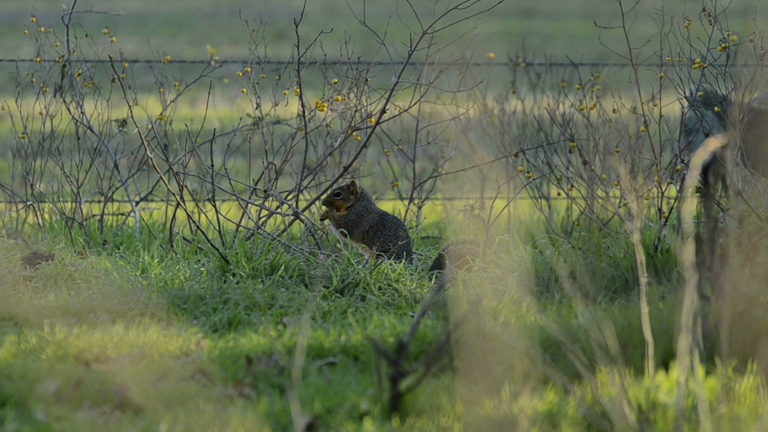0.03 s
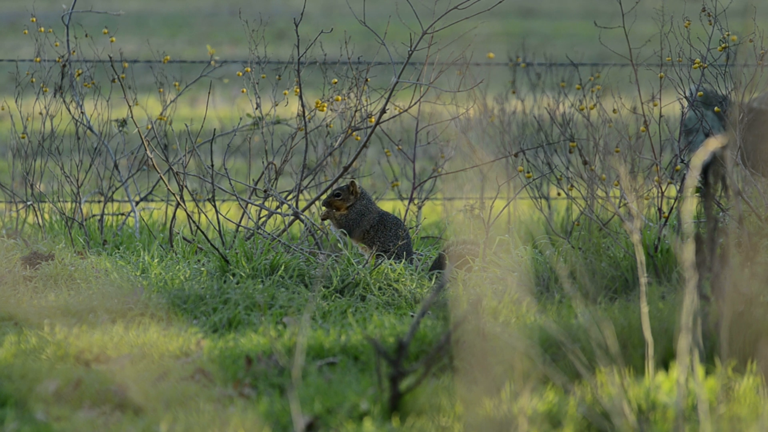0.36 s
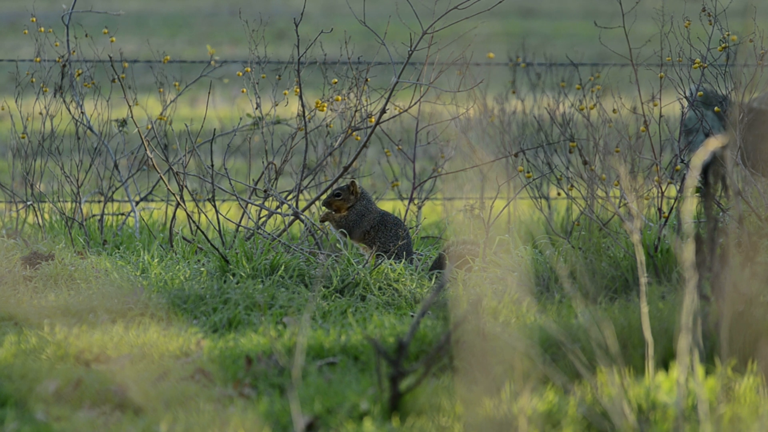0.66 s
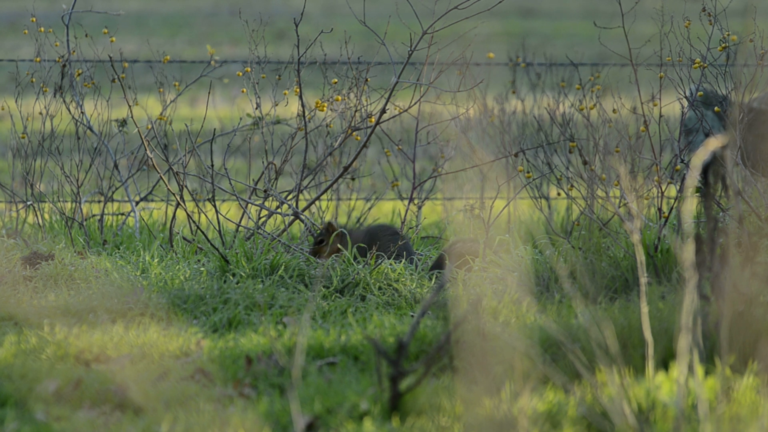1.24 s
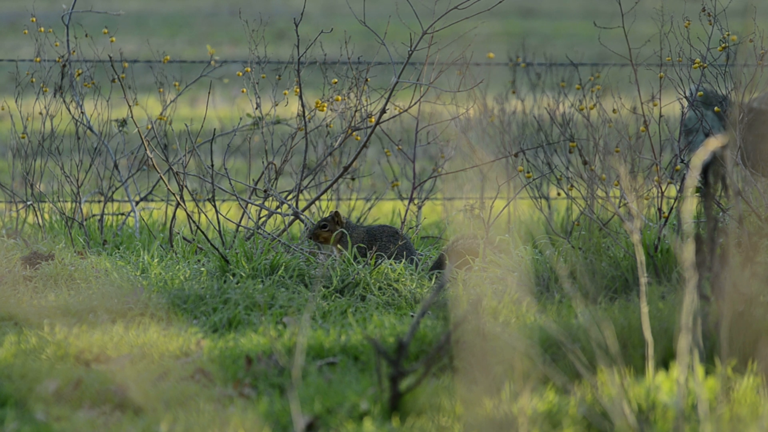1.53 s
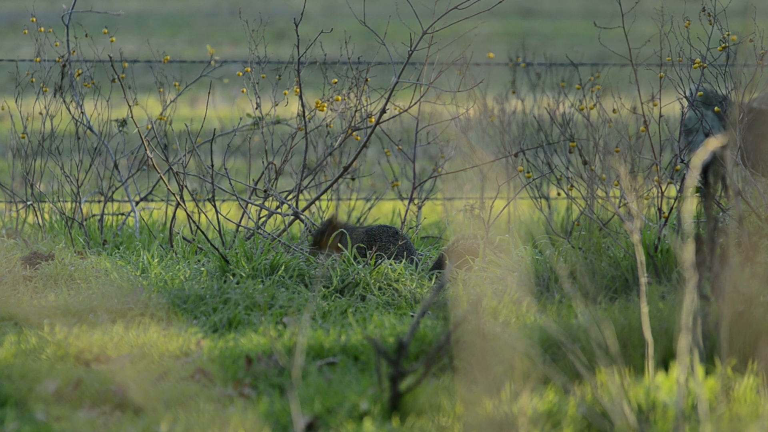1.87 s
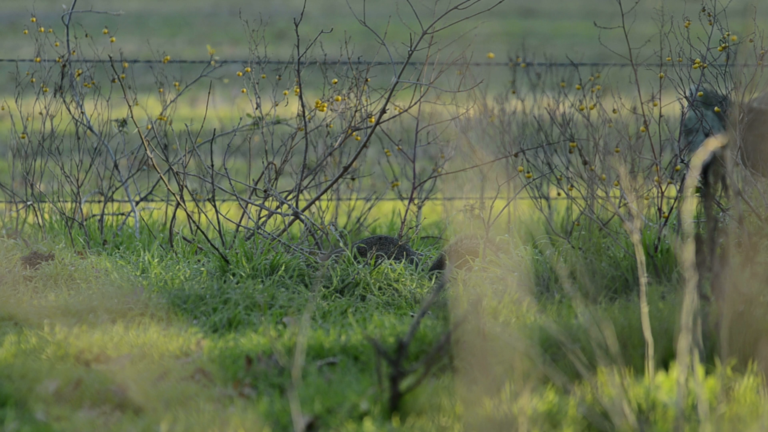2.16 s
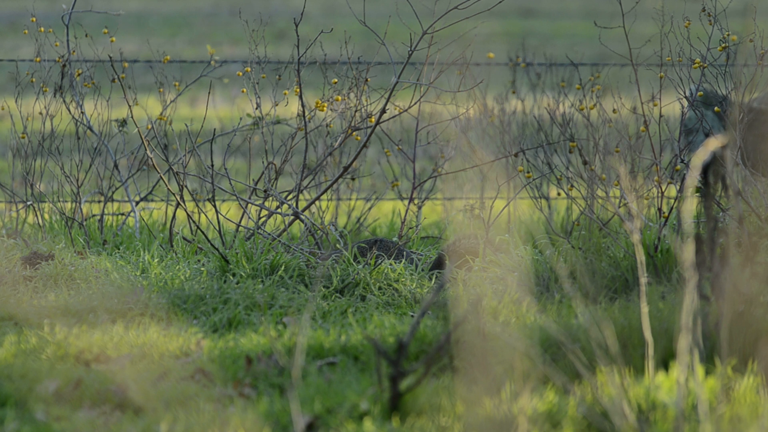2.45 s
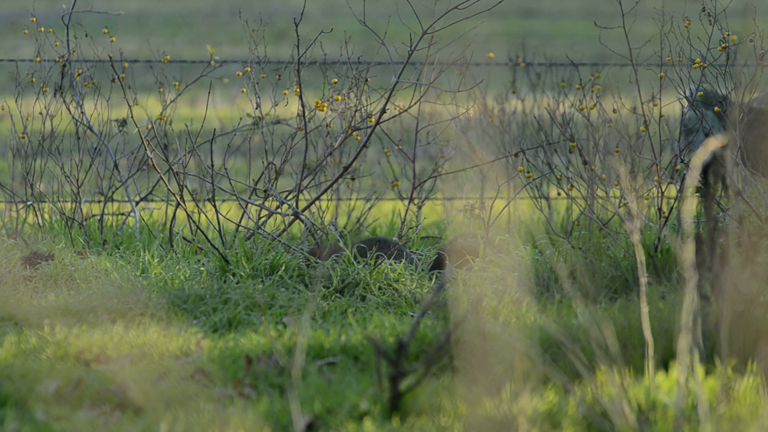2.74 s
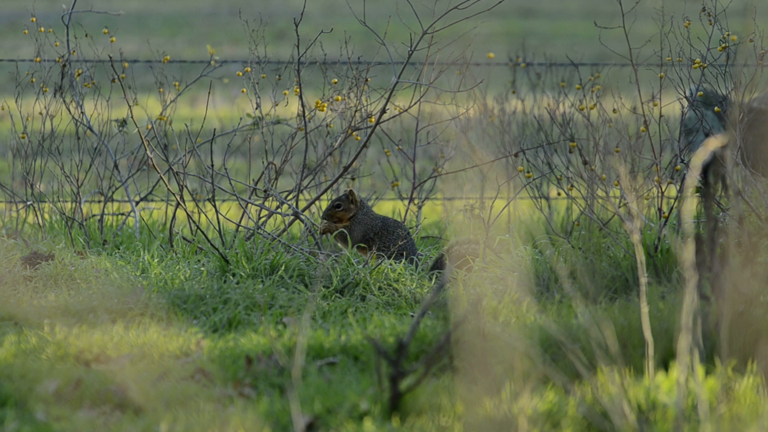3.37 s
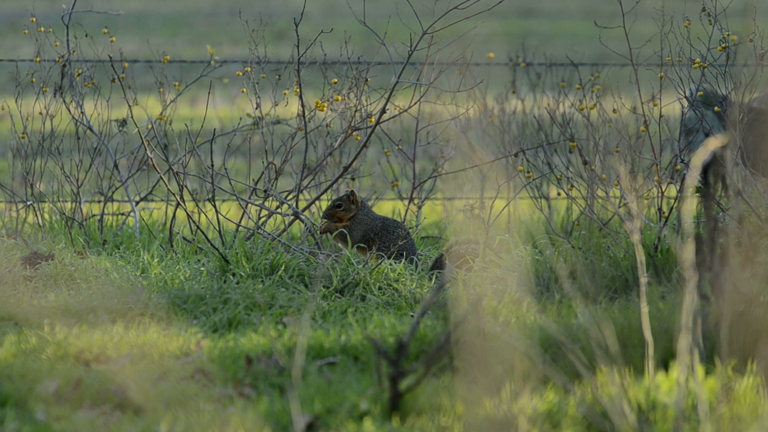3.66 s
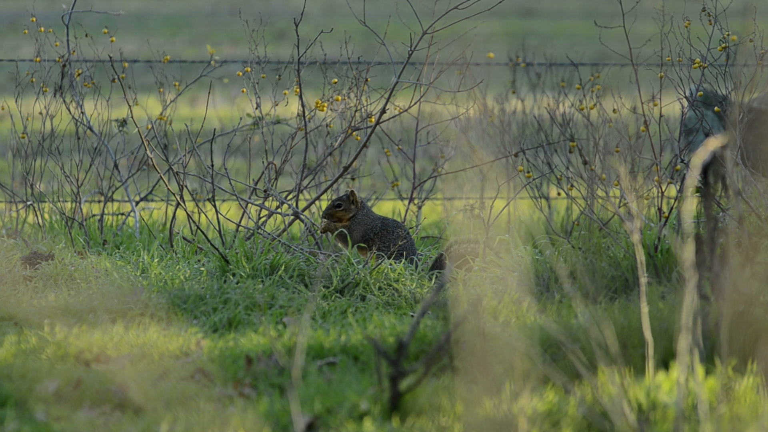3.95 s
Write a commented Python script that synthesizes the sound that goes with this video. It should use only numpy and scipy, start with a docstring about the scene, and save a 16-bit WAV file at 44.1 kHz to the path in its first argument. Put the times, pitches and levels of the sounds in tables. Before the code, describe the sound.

Wind buffets the microphone in an open field, a low, uneven rumble with irregular thumps. It eases around 1 second, then builds from 1.4 to 2.6 seconds. Two short, bright clicks sound close by, at about 1.1 and 2.4 seconds. The wind lulls near 2.8 seconds and gusts again from 3.3 to the end at 4. A faint hiss and barely audible distant bird calls lie underneath.

```python
"""Gusty wind buffets a camera microphone in an open grassy field, with one short lull.
Hundreds of small eddies push and pull at the microphone, with big single buffets among them.
Close by, a small hard part, probably a dial on the camera, clicks twice: a crack and a short ring.
Behind it lie faint brushes of dry grass, very distant hoarse bird calls, one thin falling chirp
and a soft bed of hiss."""
import sys
import numpy as np
from scipy import signal
from scipy.fft import rfft, irfft
from scipy.io import wavfile

SR = 44100
rng = np.random.default_rng(int(sys.argv[2]) if len(sys.argv) > 2 else 0)


def wrap_up_sound(samples):
    """Save the sound to the file named by the first command line argument, as 16-bit audio."""
    columns = np.atleast_2d(samples).T
    # keep every value between -1 and 1, then stretch to whole-number steps
    tamed = np.clip(columns, -1, 1)
    steps = np.round(tamed * 32767).astype(np.int16)
    wavfile.write(sys.argv[1], SR, steps)


N = 176400

# The ride of the wind; faster air is brighter: time_s, level_db, corner_hz
GUSTS = [(0, -29, 117), (.12, -27.5, 111), (.25, -28.5, 109), (.3, -35.5, 84), (.34, -32.5, 111),
         (.55, -30.5, 118), (.72, -32.5, 97.3), (1.2, -34, 78), (1.4, -29, 91), (1.48, -35, 78),
         (1.53, -29, 94), (1.57, -36.5, 85), (1.61, -30, 129), (1.72, -30, 135), (1.87, -31.5, 121),
         (2.06, -27.5, 162), (2.34, -27, 144), (2.42, -31.5, 122), (2.46, -26, 165), (2.562, -30, 177),
         (2.67, -32, 97), (2.77, -38.5, 107), (2.83, -49, 56), (3.11, -49, 42.4), (3.17, -39.5, 54),
         (3.3, -36.5, 79), (3.48, -28, 139), (3.76, -26.5, 157), (3.83, -30, 107), (3.92, -25, 156),
         (4, -31, 123)]
# The biggest single thumps of air: time_s, level_db, corner_hz
BIG_BUFFETS = [(.103, -10, 116), (.141, -20.5, 172), (.328, -12, 117), (.42, -14.5, 131),
               (.502, -22.5, 152), (0.586, -31, 162), (1.355, -17.5, 113), (1.388, -16, 112),
               (1.527, -18, 173), (1.667, -21.5, 190), (1.771, -8.5, 135), (1.798, -12, 169),
               (1.83, -12, 178), (1.955, -20, 256), (2.008, -13.5, 205), (2.064, -12.5, 253),
               (2.173, -30.5, 200), (2.4004, -11, 125), (2.482, -11, 122), (2.495, -12.5, 105),
               (2.519, -11, 141), (2.531, -17.5, 336), (2.584, -10, 169), (2.602, -12, 270),
               (2.77, -19.5, 160), (2.86, -27, 52), (2.982, -31.5, 78.4), (3.161, -28.5, 84),
               (3.353, -14.5, 108), (3.447, -8, 180), (3.493, -17, 232), (3.6, -33, 199),
               (3.642, -16.5, 190), (3.713, -25, 187), (3.793, -13, 158), (3.906, -11.5, 269)]
EDDIES_PER_S, EDDY_HALF_S = 620, .012
SIZE_SPREAD_DB, CORNER_SPREAD = 2, .22
CLUMP_HZ, CLUMP_DB, CLUMP_BRIGHTEN = 30.2, 3, .11
BOOM_HZ, BOOM_WIDTH_HZ, BOOM_DB = 153, 59.6, -11.5
SUBSONIC_HZ, LOW_CUT_HZ, WIND_TOP_HZ = 24, 37, 1610

# Dial click cues: start_s, crack_db, ring_db
DIAL_CLICKS = [(1.1301, -21.5, -28.5), (2.3927, -23.5, -31)]
# Resonances of the dial: pitch_hz, swell_ms, first_click_db, second_click_db
DIAL_MODES = [(1530, .8, -25.5, -23.5), (1900, 1.25, -24, -26.5), (2450, .6, -38, -24),
              (4000, .9, -28, -28), (4520, .8, -21, -16), (4950, .7, -33, -22), (6020, 1.1, -22, -32),
              (6550, 1.1, -29, -29), (7680, 1.2, -15, -27), (8150, 1.0, -18, -23), (8900, 1.0, -19, -26),
              (9750, .7, -28, -25), (10850, .9, -22, -30), (11500, .8, -32, -30), (12800, .7, -40, -35),
              (14200, .7, -38, -37)]
# Colour of the crack: frequency_hz, relative_db
CRACK_EQ = [(500, -35), (1100, -26), (1600, 0), (3200, 8), (7000, 14), (11000, 1), (12500, -1), (16000, 0)]
# Colour of the after-ring: frequency_hz, relative_db
RING_EQ = [(1000, -20), (1500, -9), (1880, 5.5), (2300, -9), (4300, -4.5), (5300, -5.5), (6500, -2),
           (7200, -2), (7750, 2.5), (8700, -2), (9500, -8), (11000, -11), (12500, -20), (16000, -29)]
CRACK_MS, DIAL_LOW_CUT_HZ = .72, 1150
RING_RISE_S, RING_T60_S, SCATTER_T60_S, SCATTER_DB = .00078, .044, .22, -18
PING_HZ, PING_T60_S, PING_DB = 7870, .3, -25  # a thin lingering tone, relative to the after-ring

# Grass rustle cues: start_s, level_db, centre_hz
GRASS_RUSTLES = [(.036, -58, 7250), (2.81, -62, 3200), (3.341, -52.5, 4900), (3.399, -55.5, 5240),
                 (3.925, -75, 11200)]
RUSTLE_MS, RUSTLE_OCTAVES = 6, .4

# Distant bird cues: start_s, level_db
BIRD_CALLS = [(0.119, -68), (.48, -69), (.8, -70), (1.409, -68), (2.65, -69.5), (3.07, -66)]
CALL_S, CALL_HZ, CALL_ARCH, CALL_WIDTH_HZ = .15, 1313, .0497, 77
CHIRP_AT_S, CHIRP_S, CHIRP_DB = 3.655, .08, -65.5
CHIRP_HZ, CHIRP_FALL_HZ_PER_S, CHIRP_WIDTH_HZ = 7600, 10000, 260

# Colour of the hiss bed: frequency_hz, relative_db
HISS_EQ = [(100, -14), (700, 6), (1200, 3), (2200, -0.5), (3200, 0), (3900, -2.5), (4900, 0), (6300, -1.5),
           (7600, -2), (10000, -9), (12000, -19.5), (13500, -22), (16000, -39)]
# Fader ride of the hiss bed: time_s, level_db
HISS_RIDE = [(0, -59), (.3, -60.5), (.95, -58.5), (1.6, -59), (2.7, -59.5), (3.12, -60.5), (3.5, -60),
             (4, -59)]
HISS_FLICKER_DB = .78

# Treble dips of the microphone housing: centre_hz, width_hz, depth_fraction
HOUSING_DIPS = [(5690, 610, 0.83), (6880, 240, 1)]
BAND_LIMIT_HZ = 16000


def wind():
    """Eddies arrive in clumps, with big buffets among them, and boom at the microphone port."""
    gust_s, gust_db, gust_hz = np.transpose(GUSTS)
    clumps = noise(lambda hz: 1 / (1 + (hz / CLUMP_HZ) ** 4) * hz / (hz + CLUMP_HZ / 2))
    times = np.arange(0, N / SR, 1 / EDDIES_PER_S)
    air = np.zeros(N)
    for at, (late, size, speed, phase) in zip(times, rng.standard_normal((len(times), 4))):
        clump, size, speed = np.clip([clumps[int(at * SR)], size, speed], -2, 2)
        hz = np.interp(at, gust_s, gust_hz) * np.exp(CORNER_SPREAD * speed + CLUMP_BRIGHTEN * clump)
        db = np.interp(at, gust_s, gust_db) + SIZE_SPREAD_DB * size + CLUMP_DB * clump
        makeup = np.sqrt(2 * np.pi * hz / EDDIES_PER_S)  # short, bright eddies keep their weight
        add(air, at + late / EDDIES_PER_S - EDDY_HALF_S, amp(db) * makeup * eddy(hz, phase))
    for at, db, hz in BIG_BUFFETS:
        add(air, at - EDDY_HALF_S, amp(db) * eddy(hz, rng.random()))
    air += amp(BOOM_DB) * resonance(air, BOOM_HZ, BOOM_WIDTH_HZ)
    air = pass_filter(air, "high", LOW_CUT_HZ, order=1)  # the microphone's low cut
    air = pass_filter(air, "high", SUBSONIC_HZ, order=2)
    return pass_filter(air, "low", WIND_TOP_HZ, order=4)


def eddy(corner_hz, phase_turns):
    """The push and pull of one passing eddy: fullest at the corner, falling exponentially above it."""
    t = np.arange(-EDDY_HALF_S, EDDY_HALF_S, 1 / SR)
    pulse = np.exp(2j * np.pi * phase_turns) / (1 - 2j * np.pi * corner_hz * t) ** 2
    return np.hanning(len(t)) * pulse.real


def dial():
    """Each click is a crack over damped modes, tailed by a short ring and weak scatter off the ground."""
    out, t = np.zeros(N), np.arange(SR // 4) / SR
    attack = np.minimum(t / RING_RISE_S, 1)
    tail = amp(-60 * t / RING_T60_S) + amp(SCATTER_DB - 60 * t / SCATTER_T60_S)
    for click, (at, crack_db, ring_db) in enumerate(DIAL_CLICKS):
        modes = sum((-1) ** m * amp(levels_db[click]) * swell(t, ms) * np.sin(2 * np.pi * hz * t)
                    for m, (hz, ms, *levels_db) in enumerate(DIAL_MODES))
        crack = amp(crack_db) * swell(t, CRACK_MS) * noise(eq_curve(CRACK_EQ), size=len(t))
        ring = amp(ring_db) * attack * tail * noise(eq_curve(RING_EQ), size=len(t))
        ping = amp(ring_db + PING_DB - 60 * t / PING_T60_S) * np.sin(2 * np.pi * PING_HZ * t)
        add(out, at, modes + crack + ring + ping)
    return pass_filter(out, "high", DIAL_LOW_CUT_HZ, order=4)


def grass():
    """Dry blades brush in short, soft bursts."""
    out, t = np.zeros(N), np.arange(SR // 10) / SR
    for at, db, centre_hz in GRASS_RUSTLES:
        burst = noise(lambda hz: np.exp(-.5 * (np.log2(hz / centre_hz) / RUSTLE_OCTAVES) ** 2), len(t))
        add(out, at, amp(db) * swell(t, RUSTLE_MS) * burst)
    return out


def bird_calls():
    """Far-off hoarse calls, of which only the strongest, arching partial carries."""
    out, t = np.zeros(N), np.arange(0, CALL_S, 1 / SR)
    arch = np.sin(np.pi * t / CALL_S)
    tone = glide(CALL_HZ * (1 + CALL_ARCH * arch))
    for at, db in BIRD_CALLS:
        rasp = flutter(CALL_WIDTH_HZ, size=SR)[:len(t)]
        add(out, at, amp(db) * unit(arch * tone * rasp))
    return out


def bird_chirp():
    """One thin, falling note from a small, far bird."""
    out, t = np.zeros(N), np.arange(0, CHIRP_S, 1 / SR)
    arch = np.sin(np.pi * t / CHIRP_S)
    tone = glide(CHIRP_HZ - CHIRP_FALL_HZ_PER_S * t)
    rasp = flutter(CHIRP_WIDTH_HZ, size=SR)[:len(t)]
    add(out, CHIRP_AT_S, amp(CHIRP_DB) * unit(arch * tone * rasp))
    return out


def hiss():
    """A thin bed of field and microphone hiss, gently swelling and flickering."""
    ride_db = np.interp(np.arange(N) / SR, *np.transpose(HISS_RIDE))
    flicker_db = HISS_FLICKER_DB * flutter(corner_hz=20)
    return noise(eq_curve(HISS_EQ)) * amp(ride_db + flicker_db)


def amp(db):
    """Decibels to gain."""
    return 10 ** (np.asarray(db) / 20)


def unit(x):
    """Scales to an rms of one."""
    return x / np.sqrt(np.mean(x ** 2) + 1e-20)


def add(mix, start_s, sound):
    """Drops a sound into the mix on its cue."""
    start = round(start_s * SR)
    sound = sound[max(-start, 0):]
    part = mix[max(start, 0):][:len(sound)]
    part += sound[:len(part)]


def noise(shape, size=N):
    """Noise coloured by the gain curve shape(hz), at an rms of one."""
    hz = np.fft.rfftfreq(size, 1 / SR) + 1
    return unit(irfft(rfft(rng.standard_normal(size)) * shape(hz), size))


def flutter(corner_hz, size=N):
    """Random wobble, mostly slower than the corner."""
    return noise(lambda hz: 1 / (1 + (hz / corner_hz) ** 2), size)


def eq_curve(points):
    """Joins (frequency_hz, relative_db) points into a gain curve."""
    points_hz, db = np.transpose(points)
    return lambda hz: amp(np.interp(np.log(hz), np.log(points_hz), db))


def swell(t, peak_ms):
    """Rises softly to one, then dies away."""
    u = t * 1000 / peak_ms
    return (u * np.exp(1 - u)) ** 2


def glide(pitch_hz):
    """A sine that follows a pitch curve."""
    return np.sin(2 * np.pi * np.cumsum(pitch_hz) / SR)


def resonance(x, centre_hz, width_hz):
    """Picks out one resonant band."""
    return signal.lfilter(*signal.iirpeak(centre_hz, centre_hz / width_hz, fs=SR), x)


def pass_filter(x, kind, corner_hz, order):
    """A smooth high-pass or low-pass."""
    return signal.sosfilt(signal.butter(order, corner_hz, kind, fs=SR, output="sos"), x)


def scene():
    """All layers meet at one microphone."""
    return (dial() + hiss() + grass() + bird_calls() + bird_chirp() + wind())[None]


def record(dry):
    """The housing carves two narrow dips in the treble; a steep low-pass trims the very top."""
    out = dry
    for hz, width_hz, depth in HOUSING_DIPS:
        out = out - depth * resonance(out, hz, width_hz)
    low_pass = signal.firwin(255, BAND_LIMIT_HZ, window=("kaiser", 9), fs=SR)
    return signal.oaconvolve(out, low_pass[None], "same")


dry = scene()
out = record(dry)
wrap_up_sound(out)
```